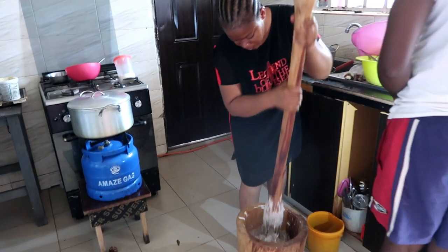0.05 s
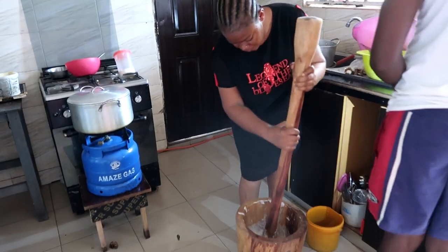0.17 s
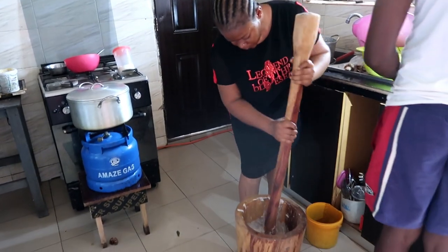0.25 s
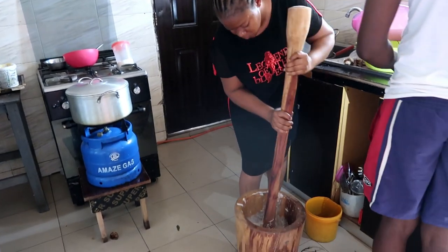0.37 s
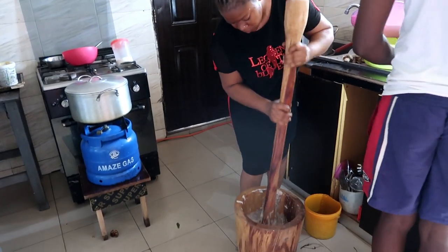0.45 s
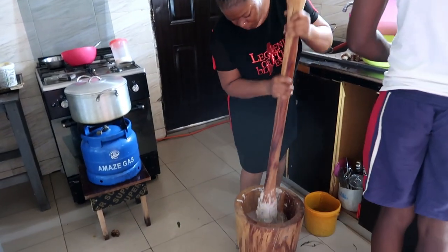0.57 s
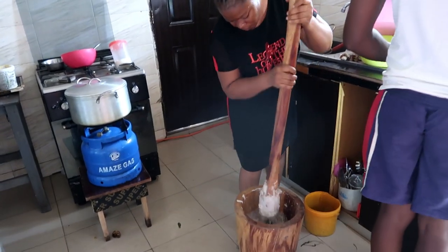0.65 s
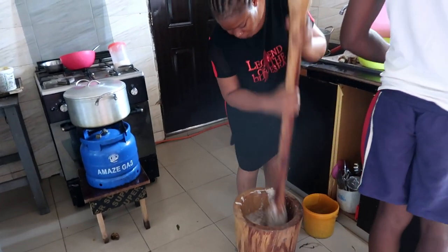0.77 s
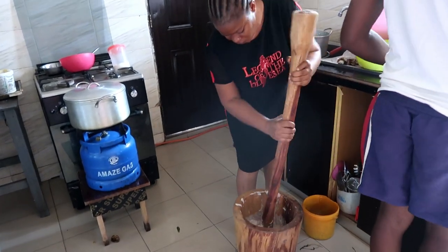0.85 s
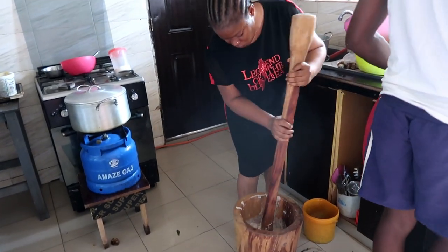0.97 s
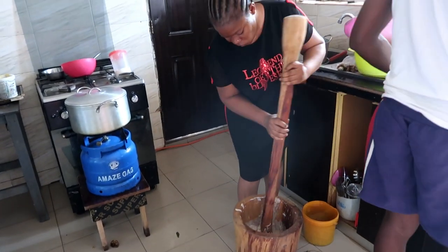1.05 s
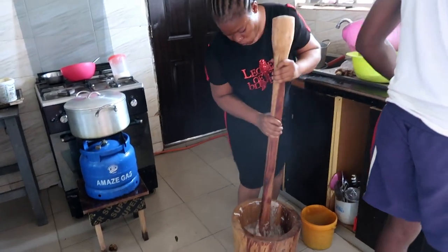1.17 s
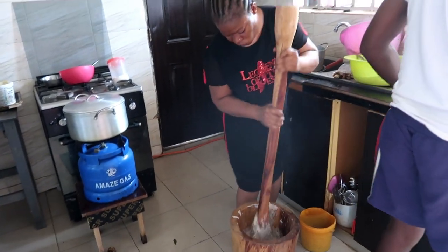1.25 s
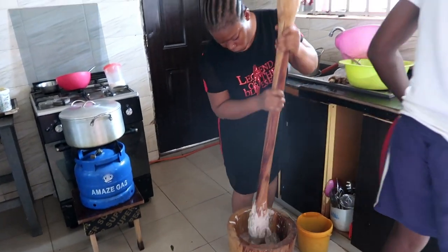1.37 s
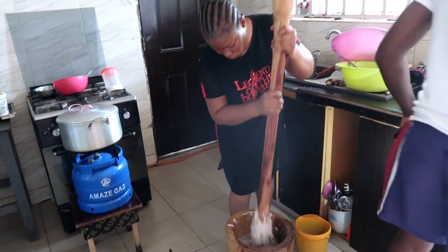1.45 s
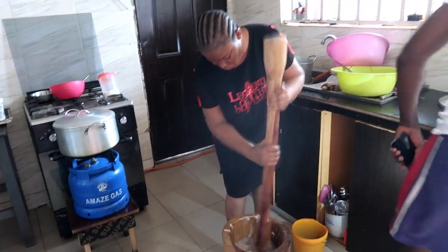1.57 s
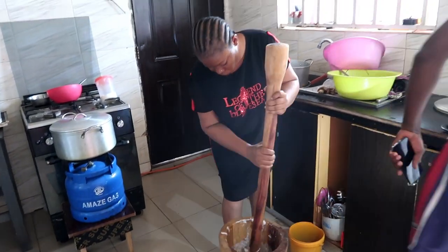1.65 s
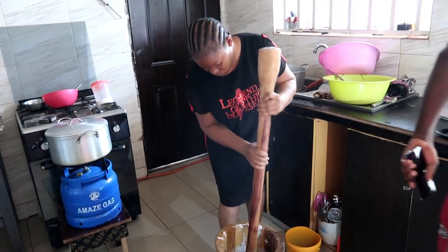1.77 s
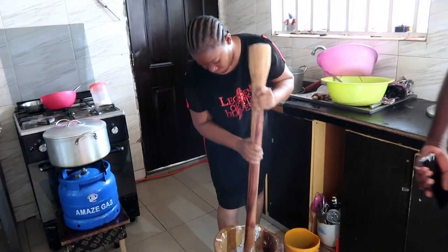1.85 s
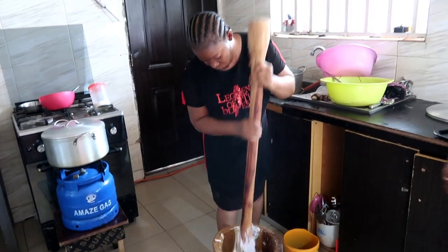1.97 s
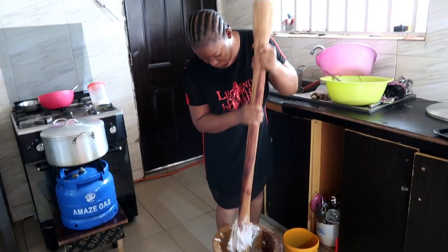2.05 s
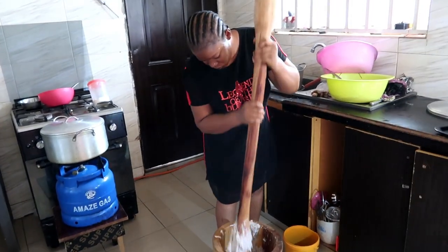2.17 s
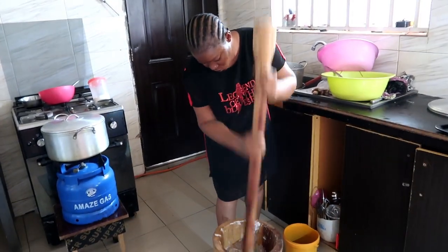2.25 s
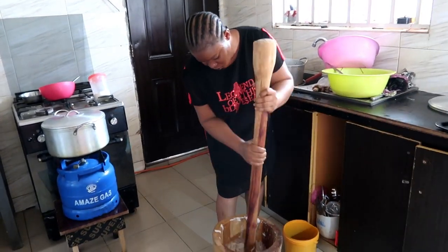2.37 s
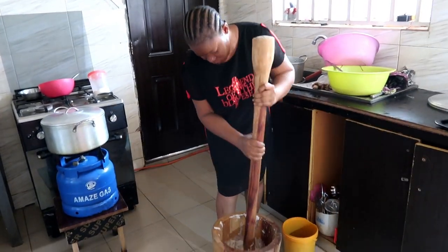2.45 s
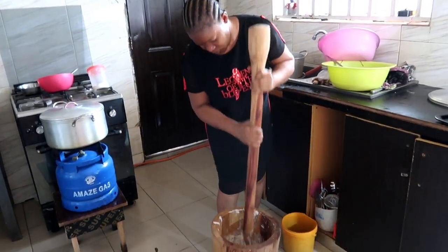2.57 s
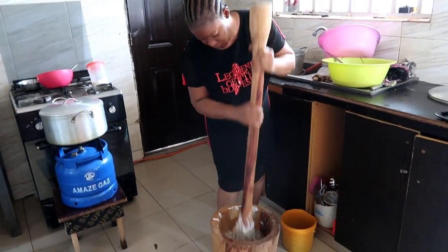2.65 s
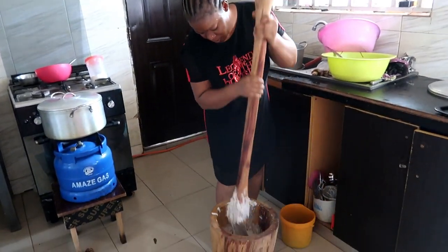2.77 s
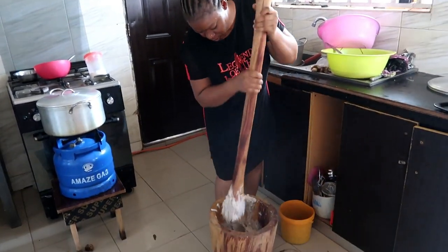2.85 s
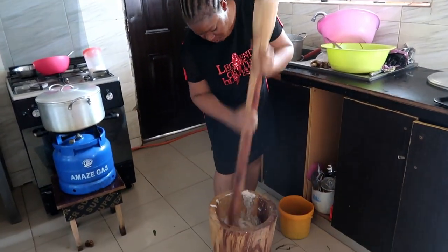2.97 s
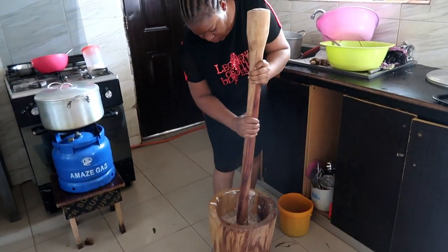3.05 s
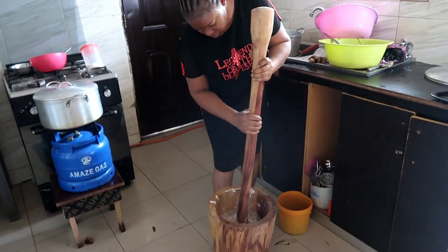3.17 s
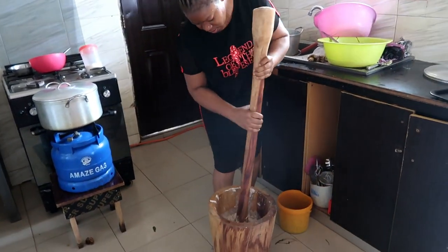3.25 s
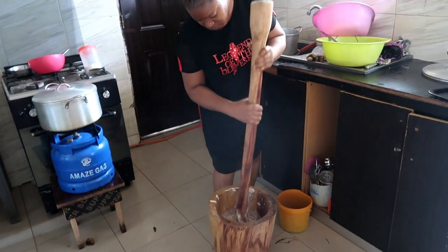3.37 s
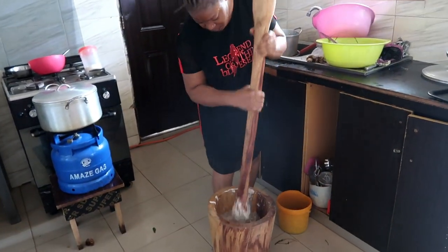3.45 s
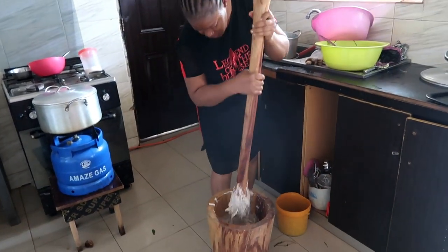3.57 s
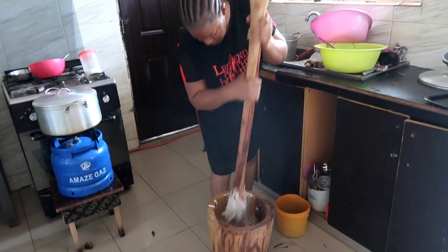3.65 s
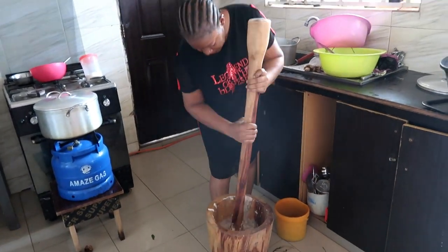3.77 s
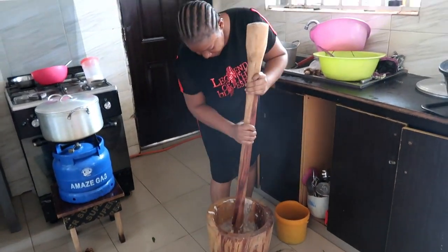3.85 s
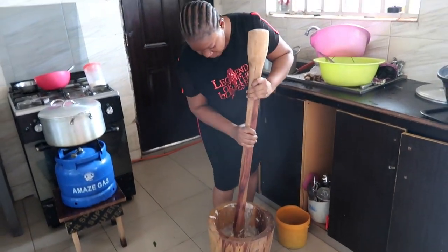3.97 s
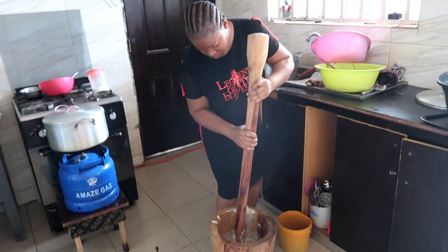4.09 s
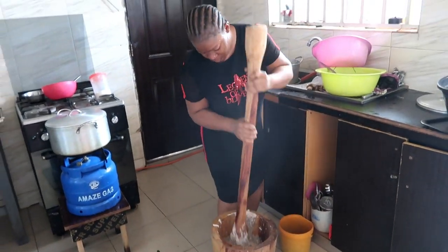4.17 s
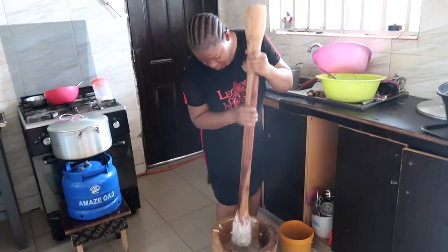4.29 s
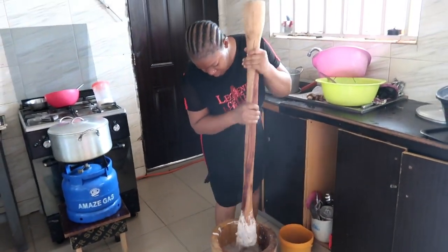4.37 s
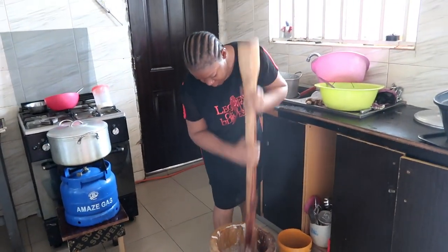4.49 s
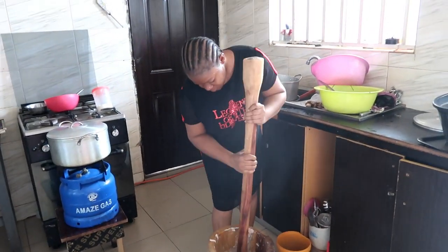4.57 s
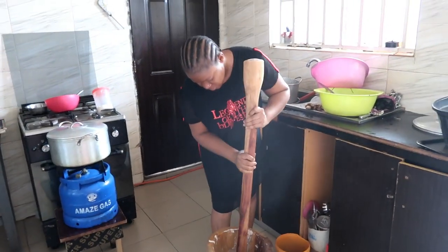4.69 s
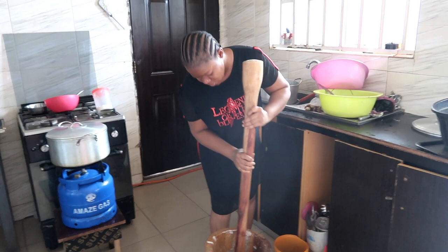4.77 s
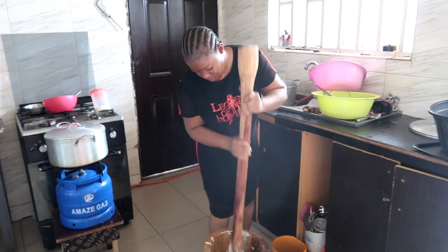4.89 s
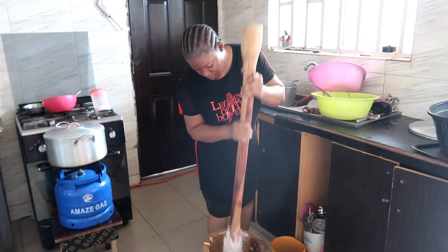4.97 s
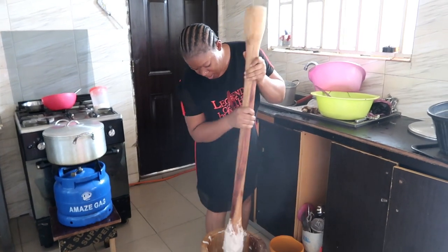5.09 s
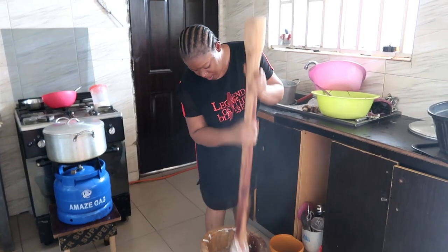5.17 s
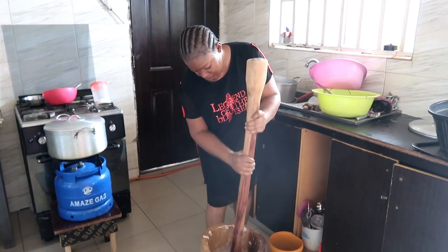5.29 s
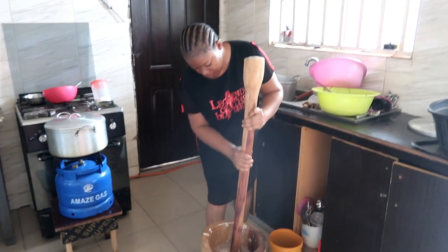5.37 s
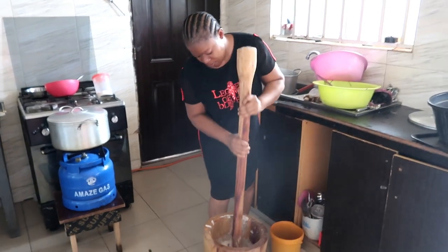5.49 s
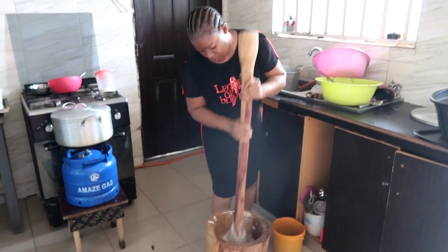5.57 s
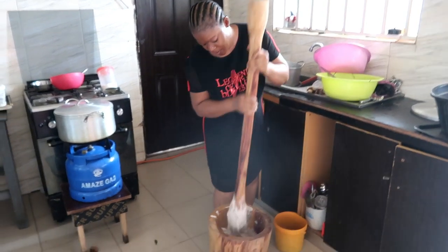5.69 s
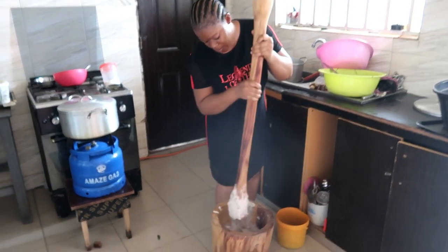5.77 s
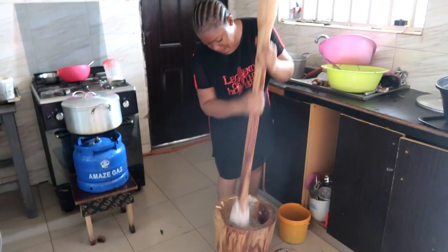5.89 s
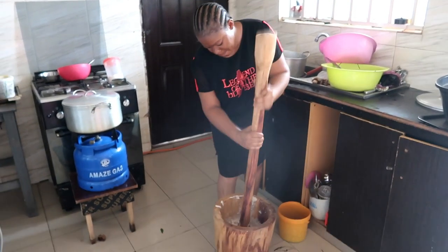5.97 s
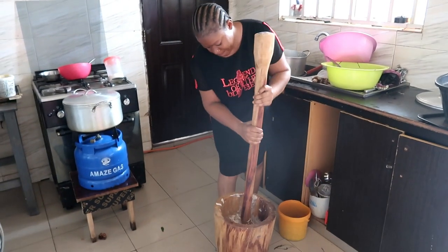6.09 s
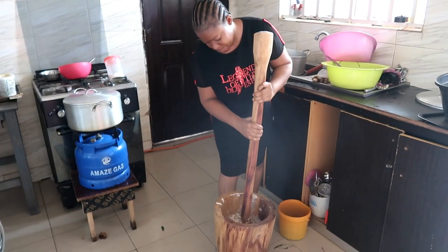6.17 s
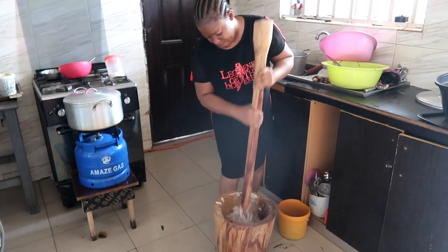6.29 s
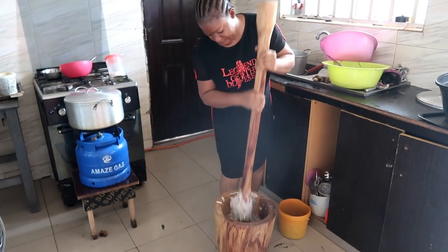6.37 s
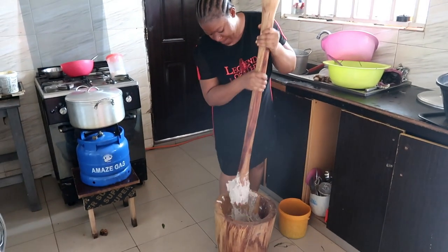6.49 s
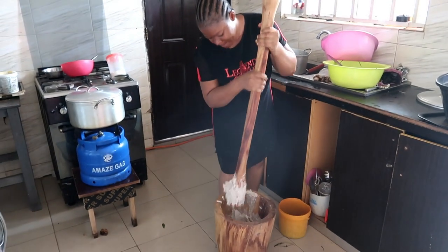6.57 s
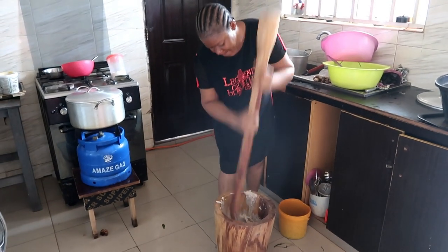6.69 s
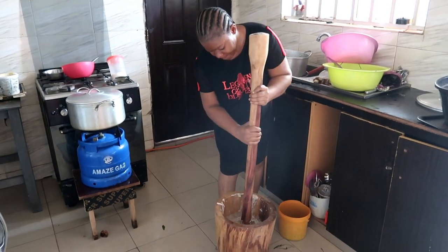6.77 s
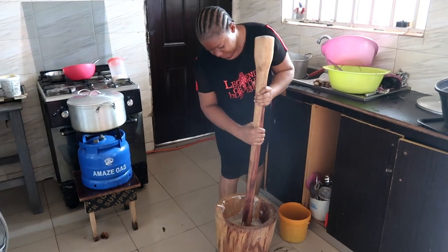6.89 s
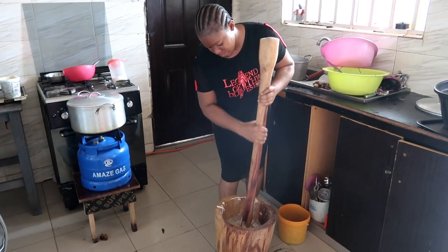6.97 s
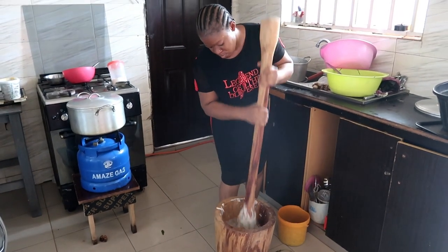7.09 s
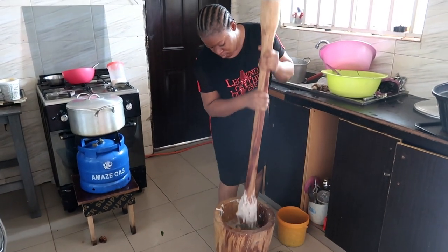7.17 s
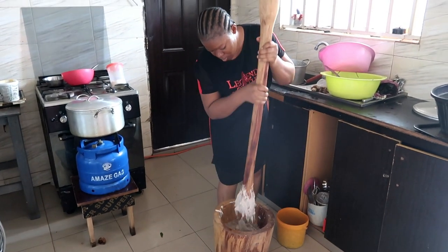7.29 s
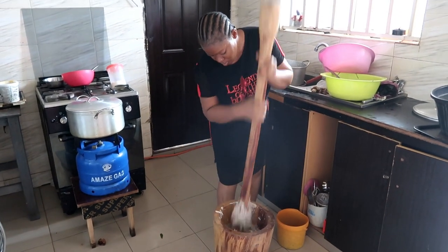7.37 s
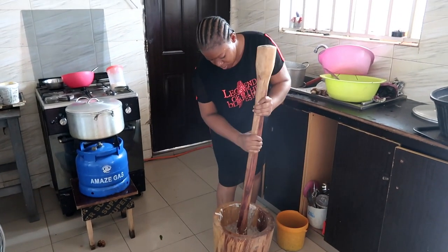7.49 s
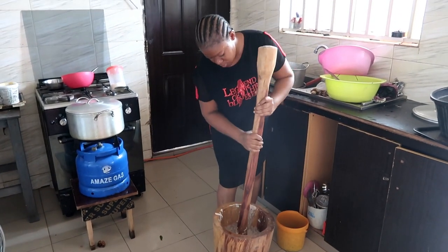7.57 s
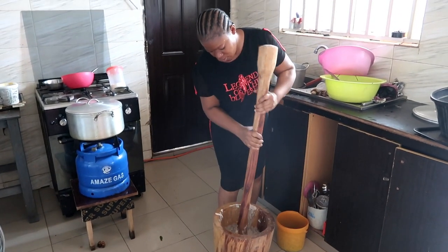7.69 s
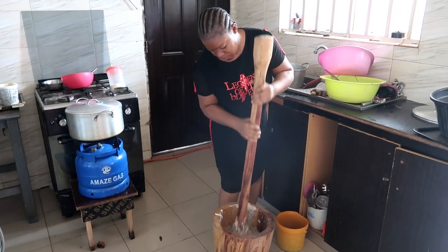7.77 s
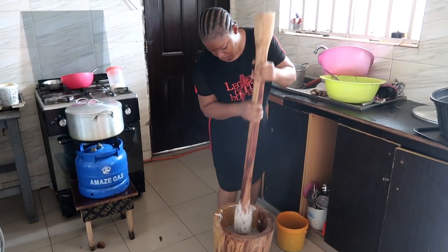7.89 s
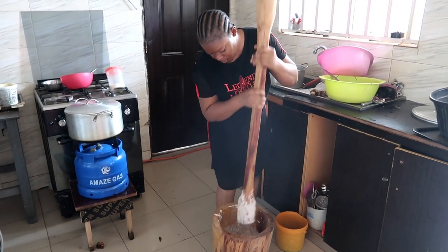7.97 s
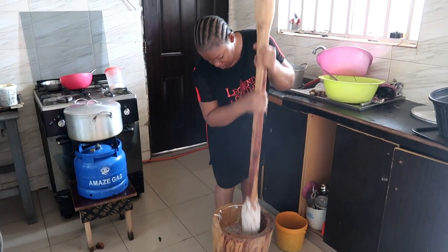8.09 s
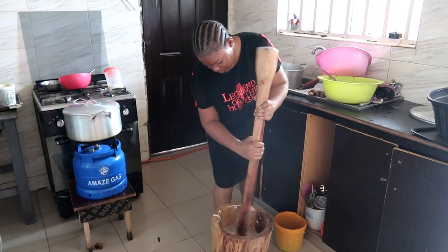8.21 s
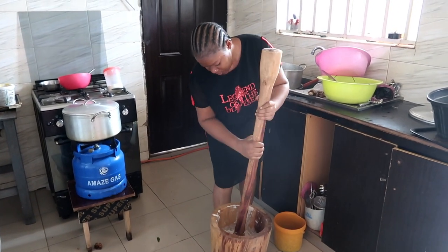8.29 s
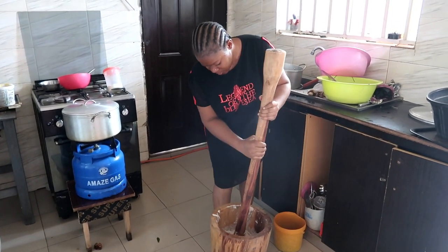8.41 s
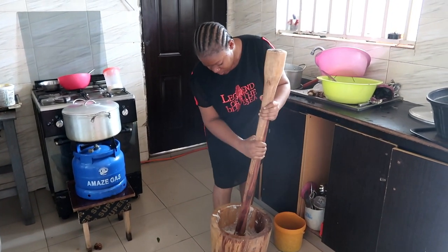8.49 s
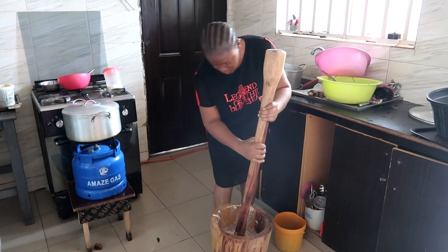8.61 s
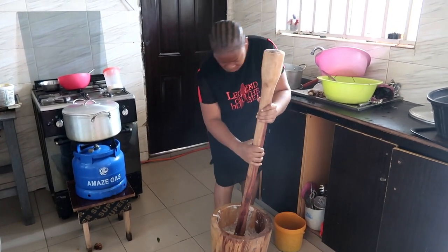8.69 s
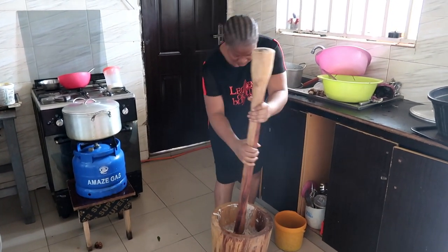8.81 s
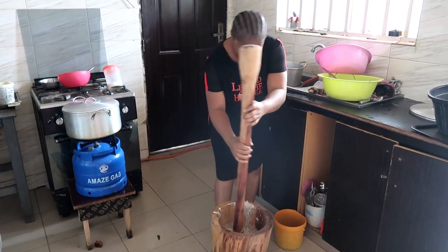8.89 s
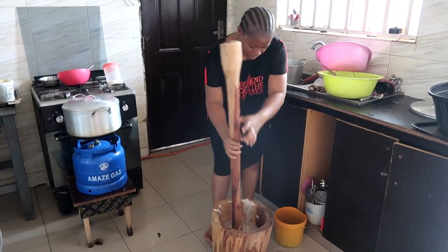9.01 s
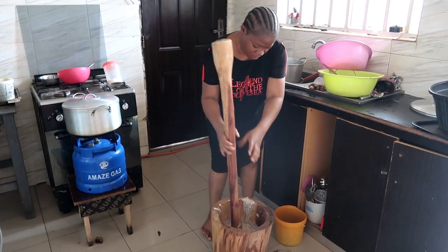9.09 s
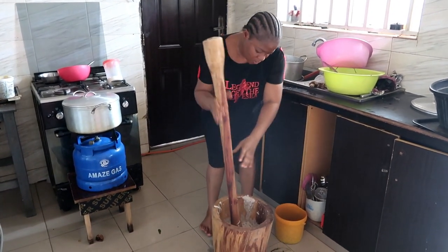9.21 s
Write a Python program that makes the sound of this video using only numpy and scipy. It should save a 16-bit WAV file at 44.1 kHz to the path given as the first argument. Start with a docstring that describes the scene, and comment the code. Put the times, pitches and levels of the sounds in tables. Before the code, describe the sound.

A wooden pestle pounds soft paste in a wooden mortar with steady, dull thuds and wet smacks, over a softly hissing gas burner.

```python
"""A gas burner roars and hisses softly in a tiled kitchen; almost at once the pounding starts.
Two metres from a phone's microphone, a long wooden pestle drives soft paste into a wooden mortar
on the floor. Each stroke smacks trapped air out of the paste and knocks the wood; the room rings on
in low modes. The background as heard ducks after most loud strokes, then creeps back.
One faint whistle falls between strokes."""
import sys
import numpy as np
from scipy import signal
from scipy.fft import rfft, irfft
from scipy.io import wavfile
from scipy.ndimage import uniform_filter1d

SR = 44100
rng = np.random.default_rng(int(sys.argv[2]) if len(sys.argv) > 2 else 0)


def dump(signal):
    """Clip the signal to [-1, 1] and save it as 16-bit WAV at the path in sys.argv[1]."""
    limited = np.clip(np.atleast_2d(signal).T, -1, 1)
    pcm = np.round(limited * 32767).astype(np.int16)
    wavfile.write(sys.argv[1], SR, pcm)


N = 407748
HZ = np.fft.rfftfreq(N, 1 / SR)


def undb(db):
    """Decibels to gain."""
    return 10 ** (np.asarray(db) / 20)


def unit(x):
    """Scales to an rms of 1."""
    return x / np.sqrt(np.mean(x ** 2))


def on_hz(table, hz=HZ):
    """Reads (Hz, value) rows on a log-frequency axis."""
    f, v = np.transpose(table)
    return np.interp(np.log(hz + 1), np.log(f + 1), v)


def add(out, x, s):
    """Mixes x into out from second s."""
    i = int(s * SR)
    out[i:i + len(x)] += x[:N - i]


def band(x, lo_hz, hi_hz):
    """Band-pass."""
    sos = signal.butter(2, [lo_hz, min(hi_hz, .45 * SR)], "band", fs=SR, output="sos")
    return signal.sosfilt(sos, x)


def walk(rate):
    """Random levels held 1 / rate seconds and smoothed twice."""
    k = int(SR / rate)
    steps = np.repeat(rng.standard_normal(N // k + 1), k)
    return uniform_filter1d(uniform_filter1d(steps, k), k)[:N]


def diffuse(gain, wider_db=0):
    """Coloured noise from all round: alike at both microphone ports in the bass, wider in the treble."""
    # Each row: frequency in Hz, side minus mid in dB.
    width = [(60, -30.5), (125, -24.5), (300, -21), (600, -27.5), (1400, -16.5), (3000, -11), (6000, -2.5),
             (15000, -10)]
    share = np.minimum(undb(on_hz(width) + wider_db), 1)
    mid, side = rfft(rng.standard_normal((2, N))) * gain / np.sqrt(1 + share ** 2)
    return irfft(np.array([mid + share * side, mid - share * side]), N)


def wavering(peaks, spread_db, rate):
    """Narrow noise bands that swell and fade, each on its own."""
    return sum(undb(db + spread_db * walk(rate)) * unit(diffuse(1 / (1 + (2 * (HZ - hz) / width) ** 2)))
               for hz, width, db in peaks)


def ducking_db(sink_s=.22, climb_db_per_s=8):
    """The background as heard ducks at set times, after most loud strokes, then creeps back."""
    # Each row: start in seconds, level in dB from which it climbs.
    climbs = [(0, -38), (.18, -38), (.89, -39.5), (1.64, -42.5), (2.33, -47.5), (3.06, -41), (3.82, -38),
              (4.548, -35.5), (5.28, -49.5), (6.04, -43.5), (6.79, -39.5), (7.52, -35.5), (8.24, -47)]
    s, from_db = np.transpose(climbs)
    t = np.arange(N) / SR
    latest = np.searchsorted(s[1:], t - sink_s / 2)
    steps_db = (from_db - climb_db_per_s * s)[latest]
    return uniform_filter1d(steps_db, int(sink_s * SR), mode="nearest") + climb_db_per_s * t


def burner():
    """Behind the mortar a flame roars, each octave fluttering alone, over a hum and under faint jets."""
    # The flame's spectrum. Each row: frequency in Hz, relative density in dB.
    flame = [(88, -40.5), (150, -3), (535, -1), (787, -5), (883, -3), (1350, -14), (1640, -11), (2600, -19),
             (3150, -18), (3470, -23), (3820, -20.5), (5840, -37), (8410, -32.5), (15000, -65.5)]
    # Whistling gas jets and low hum. Each row: centre in Hz, width in Hz, relative level in dB.
    jet_bands = [(745, 25, -15.5), (1644, 24, -17), (2075, 210, -16.5), (3155, 66, -20.5),
                 (3820, 230, -23.5), (5680, 1430, -20)]
    hum_bands = [(47.6, 12, -2), (69, 21, -18.5), (122.4, 7.1, -15)]
    colour, roar = undb(on_hz(flame)), 0
    for hz in 180 * 2. ** np.arange(7):
        octave = np.clip(1 - abs(np.log2((HZ + 1) / hz)), 0, 1) ** .5
        roar += undb(.55 * walk(38)) * diffuse(colour * octave)
    jets = wavering(jet_bands, spread_db=1.9, rate=14)
    hum = undb(-1.5) * wavering(hum_bands, spread_db=2.2, rate=11)
    return undb(ducking_db()) * (unit(roar) + jets + hum)


def rings(modes, rise_cycles, size=SR):
    """One decaying complex tone per mode, building up over rise_cycles of its period."""
    hz, db, t60 = np.transpose(modes)[:, :, None]
    t = np.arange(size) / SR
    rise = 1 - np.exp(-t * hz / rise_cycles)
    return undb(db) * np.exp((2j * np.pi * hz - np.log(1000) / t60) * t) * rise


def pestle_thuds(contact_ms=1.52, detune=.03):
    """Wood meets wood. Each blow lands elsewhere, shaking every mode with its own strength and phase."""
    # Each row: start in seconds, level in dB, then floor boom, thump, pestle knock, room ring and
    # hollow note in dB against the bowl, build-up in ms, note of the bowl in Hz.
    blows = [(.169, -21, -14, -12, 3.5, 10.5, 5.5, 4, 390), (0.222, -9, -7, -10, -21, 3, 3, 4.7, 405),
             (.854, -19, -10, -14, -8, 3, 6, 4.9, 404),
             (0.895, 0.5, -22.5, -17.5, -10.5, -9.5, -8.5, 0.11, 393.5),
             (0.9018, -8, -29, -24, -2, 4.5, -5.5, .2, 398), (1.624, -8.5, -11.5, -9, -17, 7, 3, 4, 379),
             (1.6422, 3, -42, -38, -5, -5.5, -8.5, 0.47, 401),
             (2.322, 2.5, -33, -25.5, 0, -7, -10, 5.8, 395),
             (2.355, -1, -24.5, -26.5, -5, -18, -17.5, 0.22, 397.5),
             (2.366, -0.5, -26, -26, -1, -14.5, -12, 1, 397),
             (2.386, -5.5, -29, -18, -25, -1, -6.5, 1.7, 379),
             (3.062, -8.5, -16, -14, -5, -0.5, 0, 2.4, 403), (3.069, -10, -12, -14.5, -14, 3, -1, 3, 400),
             (3.765, -20, -29, -24, -10, 1, -8, 2.7, 340), (3.818, -4, -16, -13.5, 0, 3, -6.5, 0.32, 407),
             (3.824, -5, -19, -24, -5, 2.5, -9.5, 1, 353), (3.875, -8.5, -27, -34, -18, -5, -12, 3.6, 418),
             (4.551, -3.5, -25, -25, -23, 0, -4, 3.8, 414), (4.592, -4, -16.5, -15, -17, 1, -2, 2.4, 397),
             (5.279, -8.5, -22, -33, -2, 1.5, 2, 1.3, 387),
             (5.285, 4.5, -38, -35.5, -8.5, -15, -15, .44, 416),
             (5.32, 1, -28, -30, -7, -10.5, -8, 0.58, 405.5),
             (5.329, -3, -23, -26, -3.5, -14, -7, 0.82, 401),
             (5.347, -10, -22, -30, -4, 4.5, -4.5, 2.5, 384),
             (6.022, -14.5, -29.5, -26, -4, 12.5, 4.5, 6, 398),
             (6.042, -7.5, -12.5, -11.5, -5, 2, -0.5, 1.1, 390),
             (6.048, -7.5, -31, -25, -3.5, -6, -2.5, 1.8, 390),
             (6.07, -8.5, -23, -20, -3.5, 2, -4.5, 1, 400),
             (6.741, -24.5, -13, -18, -22, 10, 9.5, 6.3, 390),
             (6.79, -11.5, -17, -3, -14, 5.5, -3, 1.3, 414), (6.7974, -2, -15, -21, -21, 3, -6, 0.46, 322),
             (7.516, -7, -10.5, -10.5, -3, -1.5, -7, 1, 392), (7.527, -4, -10, -12, -27, 1, -6, 1.1, 395),
             (8.242, -8, -20, -9.5, -16, 4.5, -0.5, 1.8, 386),
             (8.268, -3.5, -40, -34, 2, -1, -3.5, 1.1, 387), (8.282, -5, -29, -23, -19, -10, -3.5, .6, 338)]
    # What rings. Each row: frequency in Hz, level in dB, seconds to fade by 60 dB.
    floor_modes = [(55.7, -7.5, 0.57), (62.7, -5.5, 1), (71.2, -7, 1), (75.5, -7.5, 0.78)]
    thump_modes = [(104.4, -12, 0.71), (118.9, -1.5, 0.54), (127, -3, 0.55), (150, -10.5, 0.34)]  # the whole mortar on the tiles
    pestle_modes = [(733, 2, 0.081), (841, 7, 0.04), (975, -7, 0.056), (1173, 2.5, 0.027),
                    (1450, -6.5, 0.1), (1596, -7, 0.19), (1836, -7.5, 0.087), (2110, 0, 0.04)]
    room_modes = [(159, -28.5, 0.73), (177, -15, 0.15), (194.6, -23.5, 0.57), (222.4, -17.5, 0.4),
                  (243.5, -25, 0.78), (256.5, -17.5, 0.54), (280.8, -14.5, 0.4), (293.8, -12, 0.4),
                  (318.7, -19, 0.71), (443.6, -31, 0.85), (462, -19, 0.49), (552, -29.5, 0.13),
                  (580, -60, 0.13)]
    hollow_modes = [(342.6, -13, 0.62), (364.6, -7, 0.57), (366.6, -10, 0.55), (377.3, -9.5, 0.53),
                    (417.4, -8.5, 0.4), (432, -19.5, 0.62)]  # air in the bowl and under the counter
    # Each row: multiple of the bowl's note, level in dB, seconds to fade by 60 dB.
    bowl_modes = [(.7, 0, 0.02), (.75, -12, 0.049), (.895, -12, 0.053), (1.001, 2.5, 0.1),
                  (1.14, -9, 0.052), (1.27, -9, 0.084)]
    floor, thump = rings(floor_modes, .65), rings(thump_modes, .3)
    room, hollow = rings(room_modes, 2.8), rings(hollow_modes, 2.7)
    # Scatter from blow to blow, in the order of bodies below.
    scatter_rad, scatter_db = (.26, .53, 1.6, 1.48, .69, .25), (3.9, 1.7, 3.8, 2.43, 3.57, 1.3)
    out, t = np.zeros(N), np.arange(SR) / SR
    push = (t * np.exp(-t * 4000 / contact_ms))[:SR // 40]  # the paste cushions the landing
    for s, level_db, *parts_db, build_ms, bowl_hz in blows:
        bowl = rings(np.array(bowl_modes) * [bowl_hz, 1, 1], .55, size=SR // 4)
        detuned = np.array(pestle_modes)
        detuned[:, 0] *= 1 + detune * rng.standard_normal(len(detuned))
        pestle = rings(detuned, .4, size=SR // 4)
        bodies = floor, thump, pestle, room, hollow, bowl
        blow = np.zeros(SR)
        for body, db, turn, uneven_db in zip(bodies, parts_db + [0], scatter_rad, scatter_db):
            strength, angle = rng.standard_normal((2, len(body)))
            shake = undb(uneven_db * strength) * np.exp(1j * turn * angle)
            blow[:body.shape[1]] += undb(db) * (shake @ body).imag
        blow *= 1 - np.exp(-t * 1000 / build_ms)  # deep paste lets it build up slowly
        add(out, -undb(level_db) * signal.oaconvolve(blow, push / push.sum()), s - .002)
    return out


def landing_clicks():
    """Sharp clicks, short woody rings and a brief high whistle as the pestle lands."""
    # Each row: start in seconds, peak at the mortar in dB, centre in Hz, width in octaves.
    clicks = [(.1812, -5, 2900, .8), (.1875, -14, 3200, 1), (.1912, -10, 2600, 1), (.2345, -8, 3600, .7),
              (.2348, -17, 6000, .5), (.2418, -9, 3800, .9), (.2435, -11, 3400, .6), (.894, -9, 2400, 2.5),
              (.894, -17, 5200, .6), (.9015, -14, 3400, .6), (.902, -17, 5000, .6), (.921, -27, 5000, .12),
              (.94, -29, 4900, .1), (1.6443, -11, 2500, 2.5), (1.653, -14, 3000, 1.2),
              (1.658, -13, 3500, 1.2), (1.6605, -15, 4000, 1), (2.331, -19, 2400, 1.5),
              (2.355, -7, 1000, 1.5), (2.362, -18, 4500, 1.2), (3.8215, -19, 2400, .8),
              (4.5495, -7, 1250, .5), (4.55, -12, 2350, .4), (4.5503, -14, 5000, .3),
              (4.556, -15, 2300, .15), (4.5605, -10, 2300, .3), (4.566, -16, 2300, .2),
              (4.578, -17, 2250, .15), (5.2825, -18, 2100, .3), (5.317, -21, 1750, .3),
              (5.32, -12, 850, .7), (5.323, -21, 1450, .2), (5.331, -19, 1450, .3),
              (6.7905, -15, 2200, 2.5), (6.797, -20, 1450, .12), (6.815, -23, 1450, .1),
              (8.241, -17, 6000, .1), (8.247, -11, 2600, .8), (8.248, -16, 6000, .1),
              (8.2535, -10, 6500, 1.2), (8.254, -15, 6000, .1), (8.2615, -16, 2550, .15),
              (8.2655, -3, 3500, 1.6)]
    out, click = np.zeros(N), signal.unit_impulse(SR // 25)
    for s, peak_db, hz, octaves in clicks:
        wide = 2 ** (octaves / 2)  # the narrower the band, the longer it rings
        ring = band(click, hz / wide, hz * wide)
        ring = band(ring, hz / wide ** 2, hz * wide ** 2)
        add(out, -undb(peak_db) * ring / abs(ring).max(), s)
    return out


def paste_smacks(spit_octaves=.9, pop_db=3.5, sheen_ms=12, detune=.03):
    """Trapped air pops out of the paste: a crackling spit, over a wet slap and under a fizz."""
    # Each row: start in seconds, level in dB, spit centre in Hz, slap and fizz gains in dB, decay in ms.
    smacks = [(0.183, -2, 2860, -4.5, -17.5, 6.7), (0.186, -18.5, 1500, 6, -20, 51),
              (0.193, -4, 2370, -8, -19, 31), (0.2348, -12, 3720, -2, -3, 5.4),
              (0.241, -10.5, 3000, -5, -9.5, 48), (0.852, -23, 2800, 8.5, -8.5, 71),
              (.8935, 2, 2460, 1.5, -24, 3.3), (0.9018, -12, 3400, 10, -2, 4.2),
              (0.906, -17.5, 3480, 0.5, -13, 41), (1.6054, -25, 2000, 10, -3.5, 90),
              (1.643, -6, 2110, 7, -11, 11), (1.659, -13, 2800, -24, -20, 51),
              (1.94, -47, 1960, 22.5, -22, 17), (2.314, -27, 1890, 14.5, -10, 18),
              (2.328, -30, 2200, 18, -1, 18), (2.354, -14.5, 1790, 11, -9.5, 12),
              (2.367, -16.5, 3020, -3, -7.5, 37), (3.061, -26.5, 2300, 10.5, -1, 47),
              (3.764, -36.5, 1910, 20.5, -23, 22), (3.817, -23, 2450, 2, -22, 6.5),
              (4.543, -24, 1810, 15, 2, 13), (4.549, -13.5, 2190, 10, 0, 11),
              (4.557, -15.5, 2330, 8, -1.5, 34), (4.573, -17.5, 4800, 9.5, -24, 62),
              (5.2786, -16.5, 2090, 12.5, -8.5, 4.6), (5.288, -31, 1400, 9, -10, 25),
              (5.318, -29, 1650, 8, -7, 17), (5.328, -37, 1500, 4, -15, 61),
              (5.7223, -40, 2080, 4, -13, 33), (6.008, -25.5, 2870, 5, -6, 58),
              (6.038, -16.5, 1830, 0.5, -11.5, 49), (6.739, -33.5, 1900, 14.5, -3, 130),
              (6.749, -30.5, 1500, 15, -10, 6.8), (6.789, -15.5, 1730, 4.5, -5, 38),
              (7.159, -47, 5470, -8, 11, 30), (7.466, -22, 2020, 0, -12, 30),
              (7.517, -18.5, 1970, 9.5, -8, 46), (7.9, -40.5, 5030, -10, 8, 55),
              (8.229, -24.5, 3000, -2, -2, 54), (8.236, -4, 2030, -4.5, -7.5, 19),
              (8.242, -5, 2140, 0, -5, 26), (8.252, 1, 2500, -21, -1.5, 4.6),
              (8.2652, 6, 2640, -15, -16, 2.3)]
    # The bowl's wall colours the slap. Each row: centre in Hz, width in Hz, gain in dB.
    wall_bands = [(862, 75, 0.5), (1408, 254, -1.5), (1737, 216, -1), (2247, 195, -5.5), (4370, 140, -10),
                  (4950, 230, -16.5)]
    out, t = np.zeros(N), np.arange(SR // 6) / SR
    ms, wide = 1000 * t, 2 ** (spit_octaves / 2)
    for s, level_db, hz, slap_db, fizz_db, decay_ms in smacks:
        crackle = unit(rng.standard_normal(len(t)) * undb(2.1 * rng.exponential(size=len(t))))
        swell_ms = .74 + .051 * decay_ms
        crackle *= np.exp(-ms / decay_ms) * (1 - np.exp(-ms / swell_ms))
        crackle[0] += undb(pop_db) * min(20 / decay_ms, 1)  # the first bubble bursts
        spit = band(crackle, hz / wide, hz * wide)
        slap = undb(1.5) * band(crackle, 715, 1590)
        shifts, strengths = rng.standard_normal((2, len(wall_bands)))
        for (wall_hz, width, db), shift, strength in zip(wall_bands, shifts, strengths):
            centre = wall_hz * (1 + detune * shift)
            slap += undb(db + 1.4 * strength) * band(crackle, centre - width / 2, centre + width / 2)
        sheen = undb(8) * band(crackle * np.exp(-ms / sheen_ms), 9500, 19000)
        fizz = band(crackle, 4900, 11000) + sheen
        add(out, undb(level_db) * (spit + undb(slap_db) * slap + undb(fizz_db) * fizz), s)
    return out


def kitchen_echo(x):
    """Tiles and cupboards return a dense tail: each third-octave stores energy and fades at its rate."""
    # Each row: frequency in Hz, seconds to fade by 60 dB.
    decay_times = [(700, 0.41), (1500, 0.56), (4000, 0.41), (10000, 0.028)]
    noise, tail = diffuse(np.ones(len(HZ)), wider_db=4), 0
    for hz in 650 * 2. ** (np.arange(14) / 3):
        keep = np.exp(-2 * np.log(1000) / SR / on_hz(decay_times, hz))
        energy = band(x, hz / 2 ** (1 / 3), hz * 2 ** (1 / 3)) ** 2
        stored = signal.lfilter([1 - keep], [1, -keep], energy)
        tail += np.sqrt(stored) * unit(band(noise, hz / 2 ** .2, hz * 2 ** .2))
    return np.roll(tail, int(.005 * SR), axis=1)  # the first walls answer 5 ms late


def faint_whistle(start_s=5.84, length_s=.15, hz=4900, fall_hz_per_s=1500):
    """A thin rough tone that wobbles as it falls."""
    t = np.arange(N) / SR - start_s
    pitch = (hz - fall_hz_per_s * t) * (1 + .02 * walk(200))
    swell = np.sin(np.pi * np.clip(t / length_s, 0, 1)) ** .5
    return undb(-64 + 5.8 * walk(52)) * swell * np.sin(2 * np.pi * np.cumsum(pitch) / SR)


def scene():
    """All comes from the right: it reaches that microphone port first and the phone shades the left."""
    # The microphone dulls the blows. Each row: frequency in Hz, gain in dB.
    mic_response = [(5000, -1), (8000, -5.5), (12000, -18.5), (16000, -52.5)]
    # The phone's shadow. Each row: frequency in Hz, left minus right in dB.
    shadow = [(250, 0), (1000, -0.5), (3000, -1.6), (8000, -0.5)]
    # Each row: frequency in Hz, lead of the left port in radians (negative: it lags).
    left_lead = [(0, 0), (350, -.17), (800, -.14), (3800, -.65), (6000, -1.2), (7200, -1.9), (9600, -2.6),
                 (22050, -2.4)]
    pounding = pestle_thuds() + landing_clicks() + paste_smacks()
    blows = rfft(pounding + undb(-4) * kitchen_echo(pounding)) * undb(on_hz(mic_response))
    background = rfft(burner() + faint_whistle())
    side = np.array([[.5], [-.5]])
    shade = undb(side * on_hz(shadow))
    delay = np.exp(1j * side * np.interp(HZ, *np.transpose(left_lead)))
    return irfft((blows + background) * shade * delay, N)


def record(dry, bass_cut_hz=64, top_hz=15650):
    """The phone cuts the deep bass, clips the hardest blows and cuts the top."""
    thin = signal.sosfilt(signal.butter(4, bass_cut_hz, "high", fs=SR, output="sos"), dry)
    clipped = np.clip(thin, -.96, .96)
    return signal.sosfilt(signal.ellip(8, .2, 70, top_hz, fs=SR, output="sos"), clipped)


dry = scene()
out = record(dry)
dump(out)
```